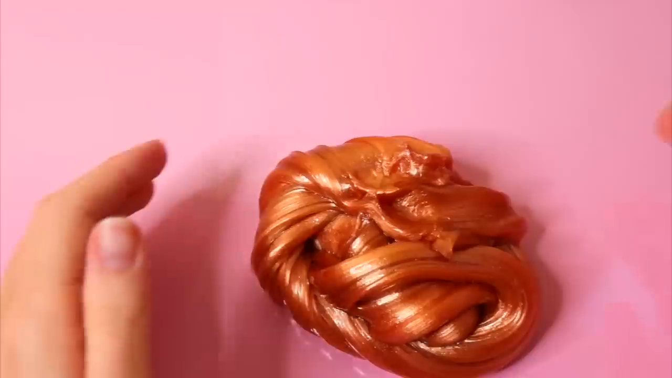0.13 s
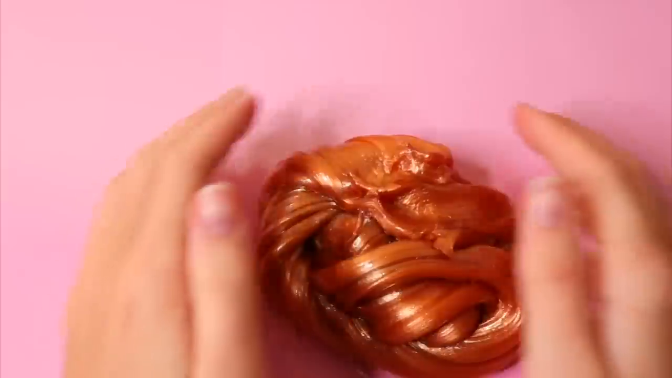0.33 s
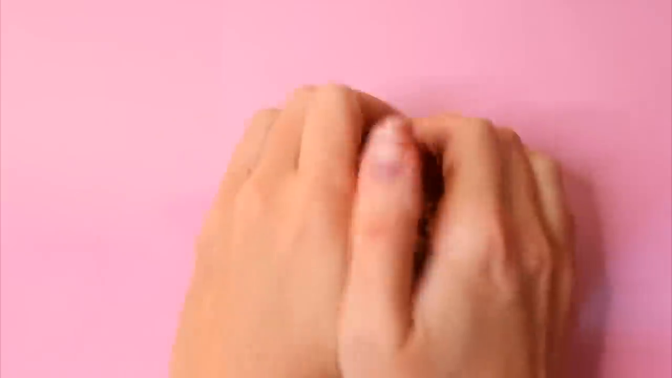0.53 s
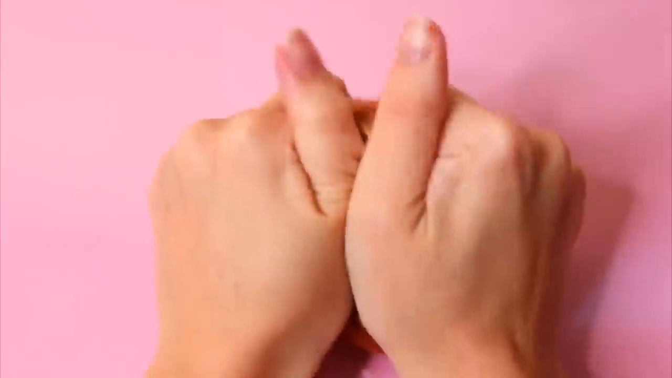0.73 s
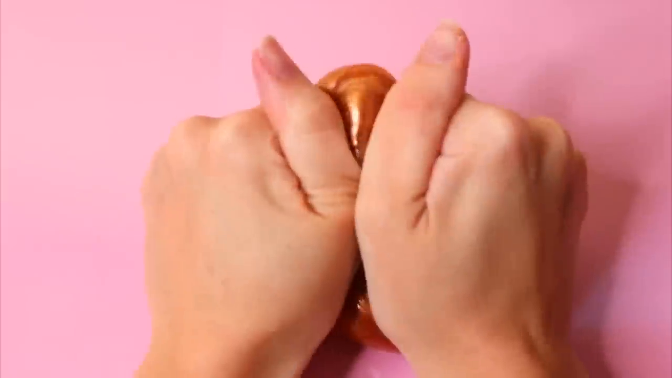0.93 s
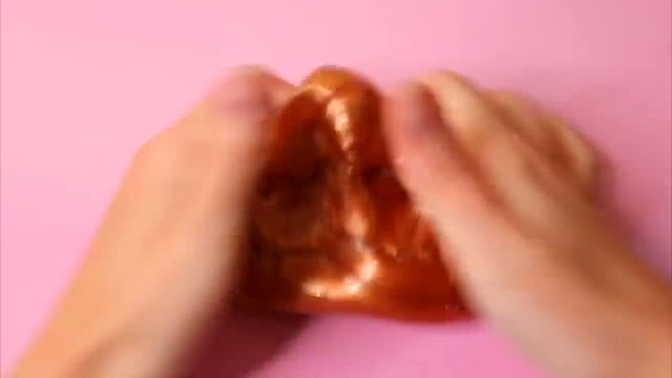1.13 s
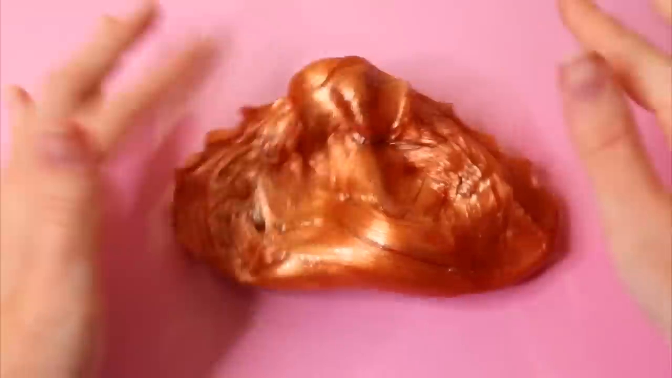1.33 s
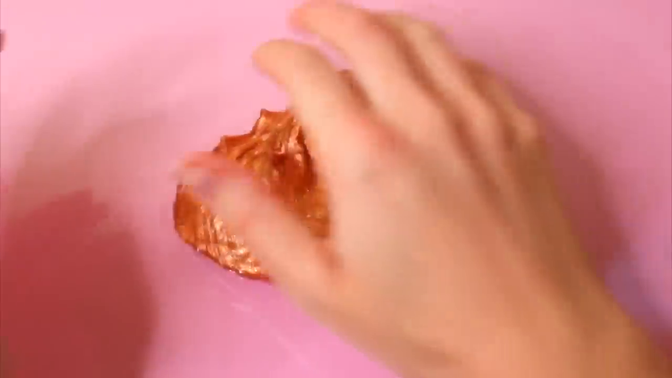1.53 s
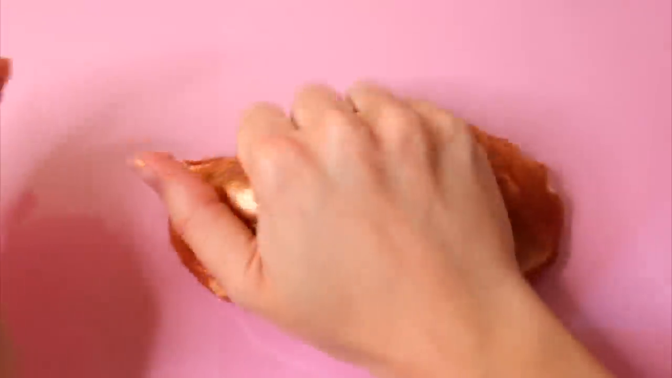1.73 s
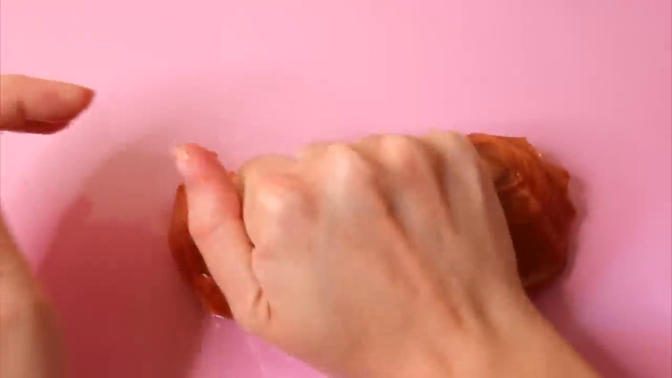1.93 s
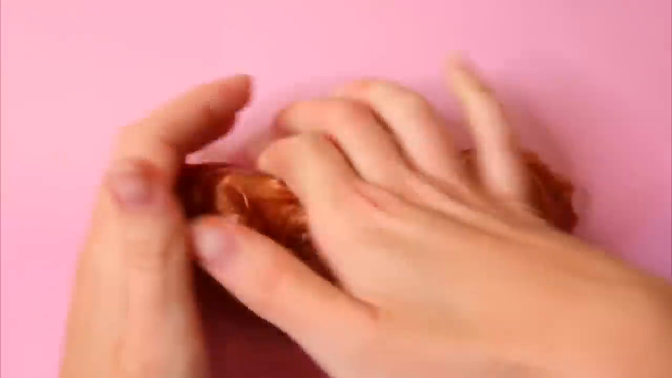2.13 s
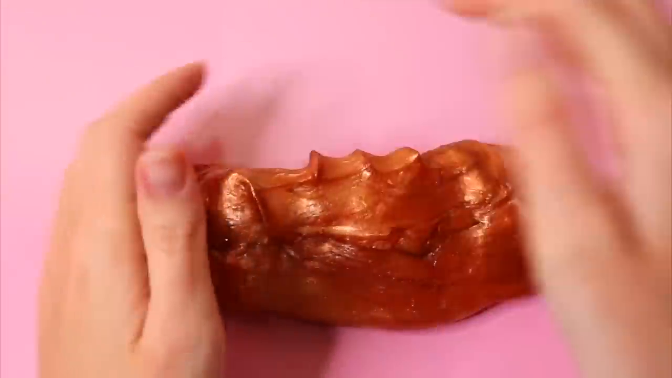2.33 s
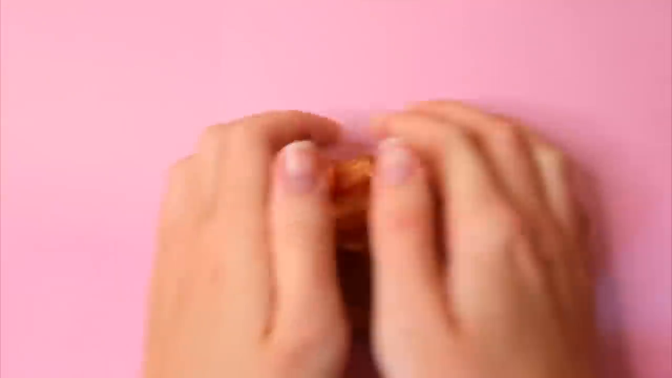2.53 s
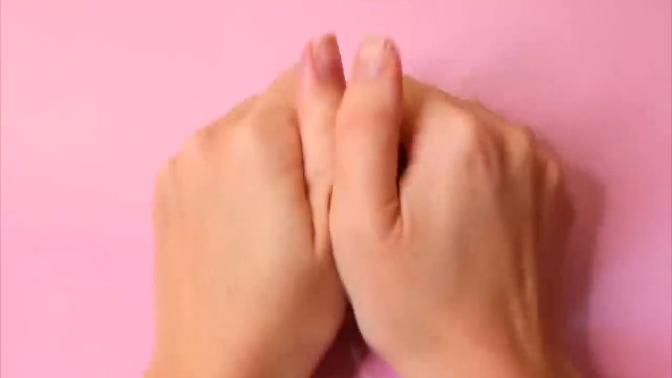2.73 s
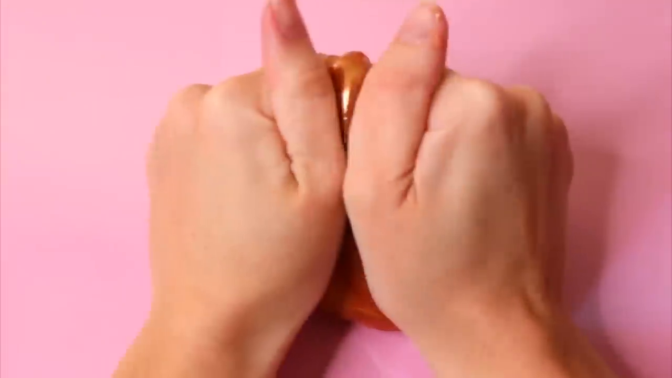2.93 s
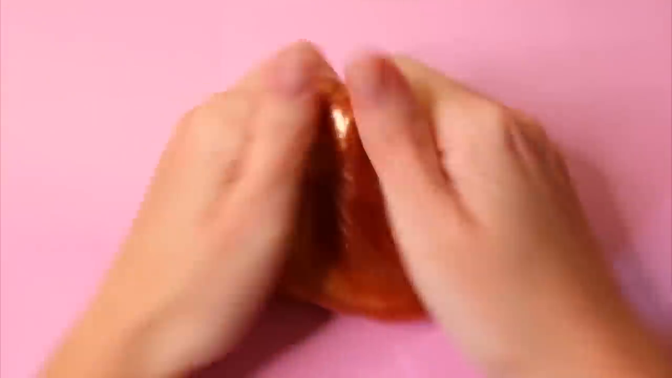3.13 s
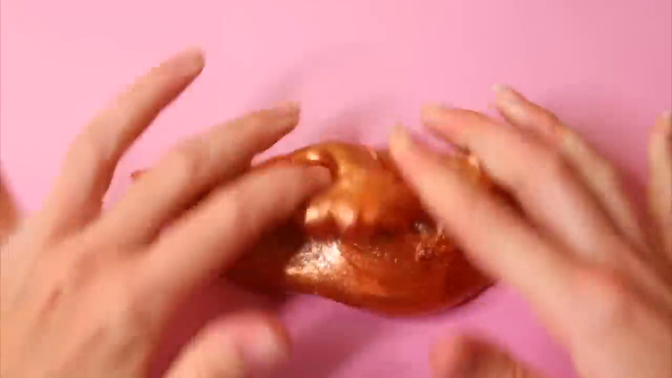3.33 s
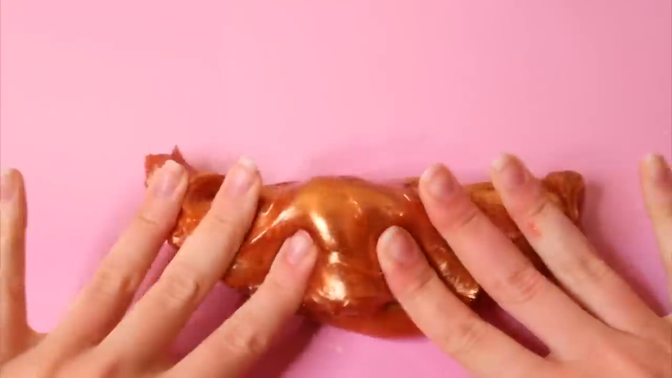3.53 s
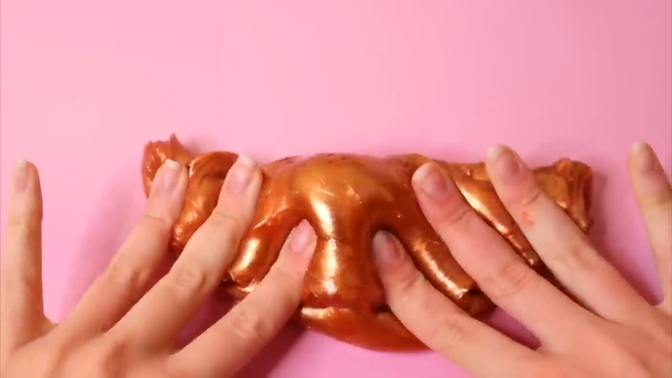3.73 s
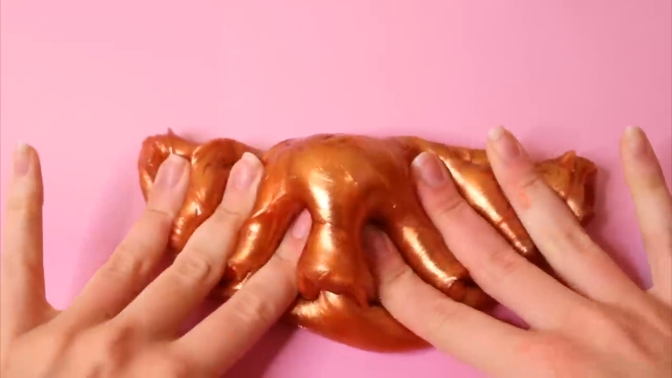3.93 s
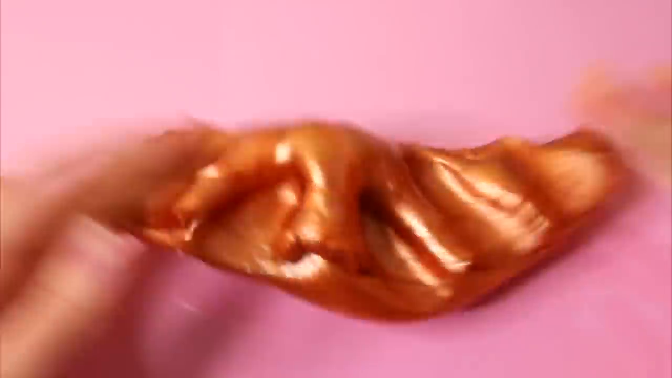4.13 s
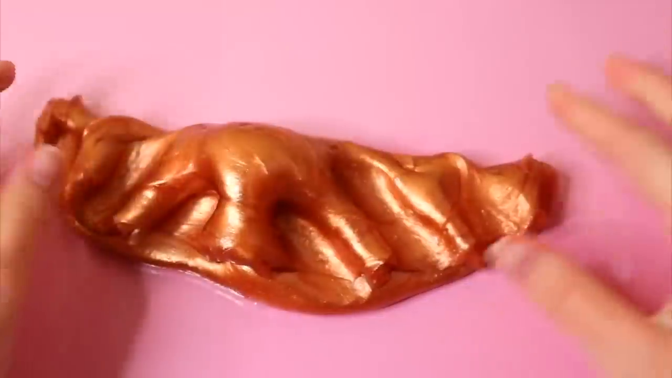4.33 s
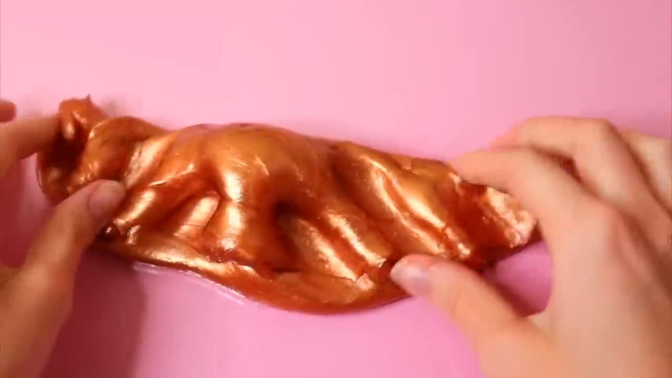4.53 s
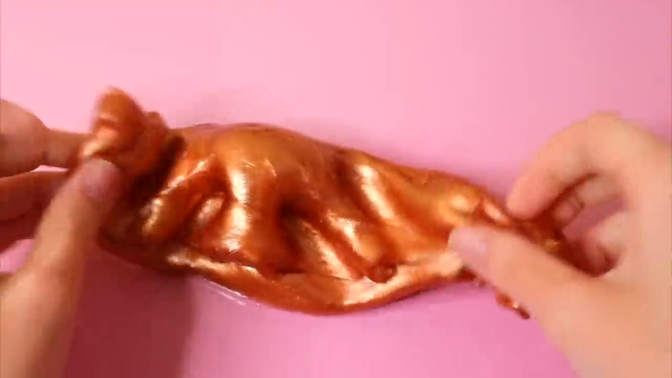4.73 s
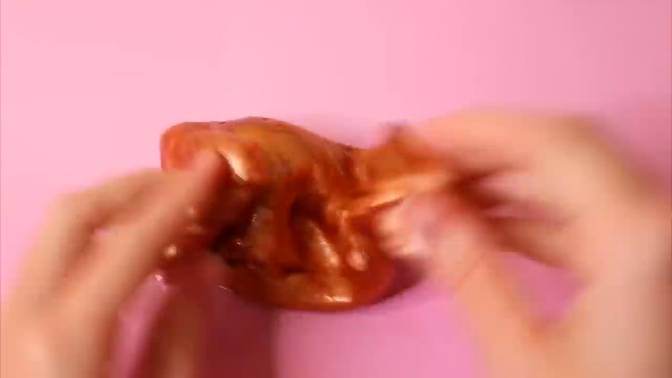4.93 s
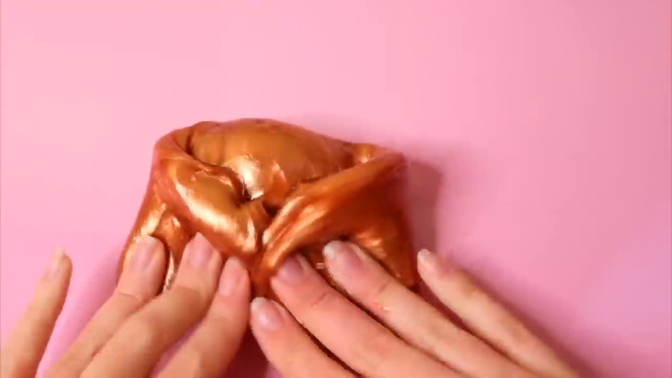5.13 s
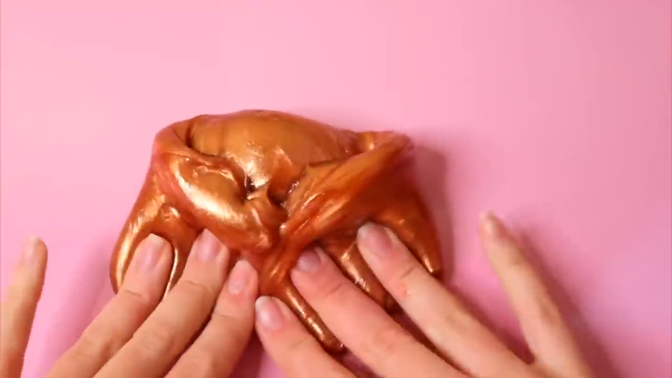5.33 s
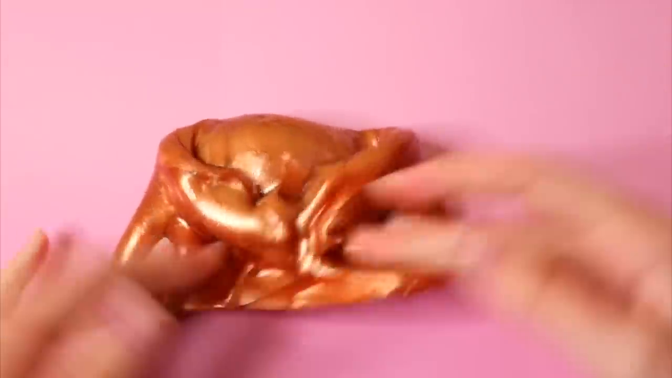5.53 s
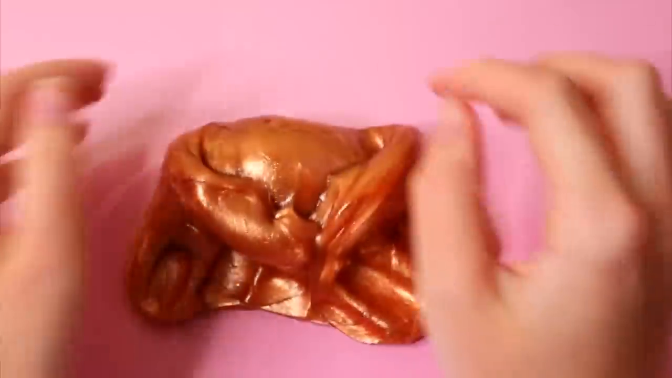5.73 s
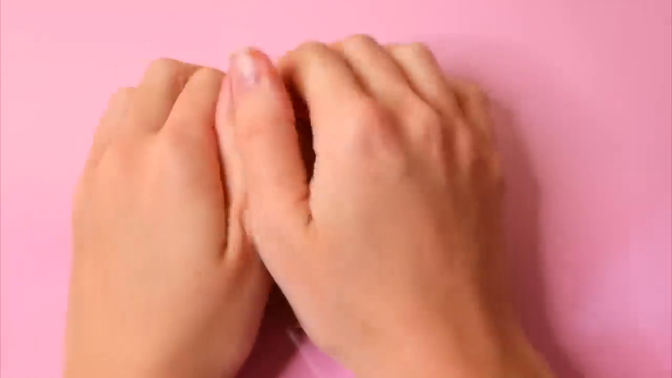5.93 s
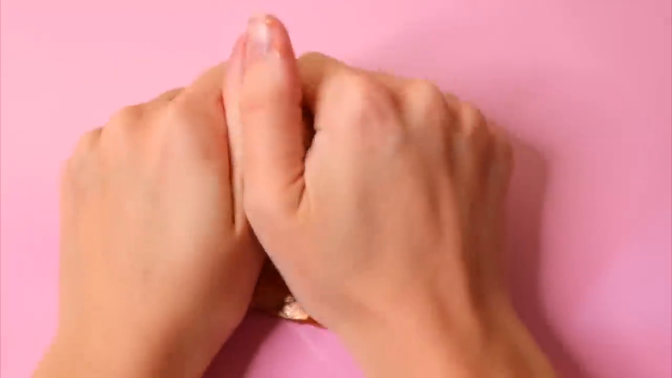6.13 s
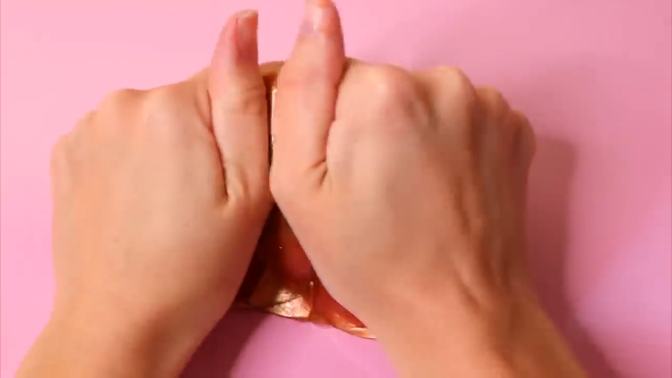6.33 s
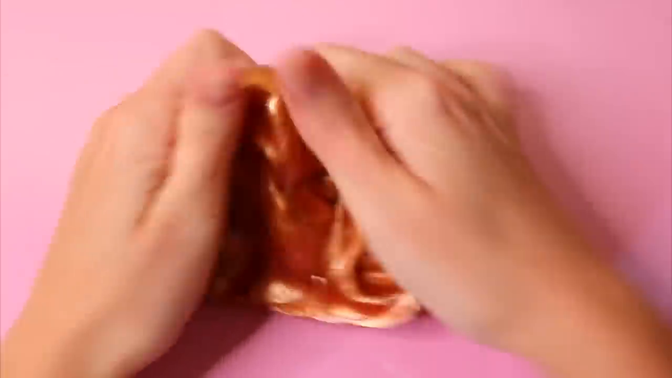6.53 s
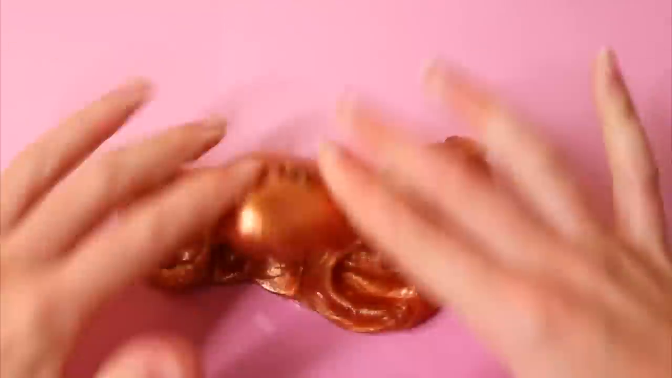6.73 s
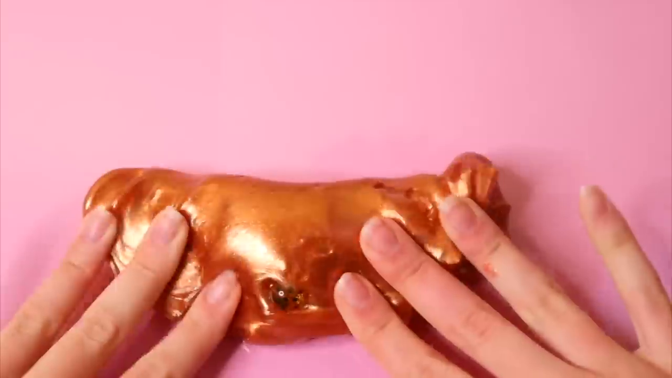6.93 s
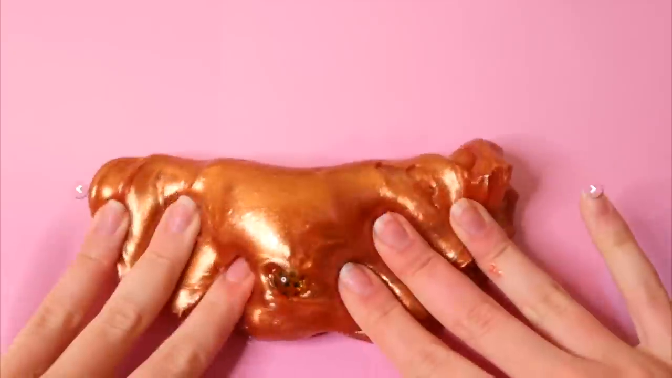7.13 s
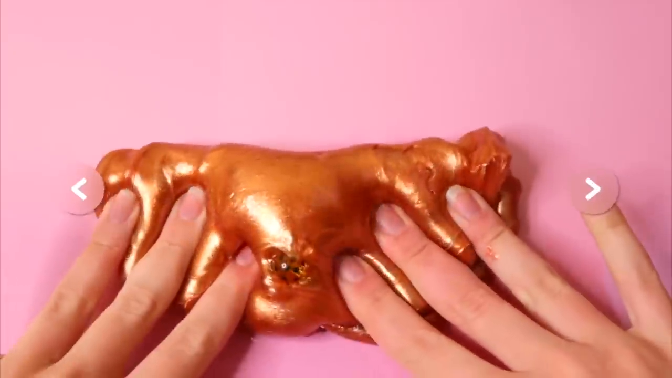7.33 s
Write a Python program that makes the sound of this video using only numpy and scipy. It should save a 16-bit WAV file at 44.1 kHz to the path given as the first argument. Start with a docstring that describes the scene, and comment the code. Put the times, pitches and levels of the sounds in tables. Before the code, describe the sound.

Sticky slime is kneaded on a tabletop in a quiet room, air pockets snapping and popping between peeling crackles and dull bumps.

```python
"""A table top in a quiet room, close to a stereo microphone: hands squeeze, press and peel sticky slime.
Trapped air pockets burst, ringing cavity and film, and each snap reflects off nearby surfaces. Threads
rupture in a fine crackle as skin peels away, and in short rips as a fold tears free. Knuckles and the
lump excite the modes of the hollow table. A short reverberant tail and a soft hiss lie underneath."""
import sys
import numpy as np
from scipy import signal
from scipy.fft import rfft, irfft
from scipy.io import wavfile
from scipy.ndimage import uniform_filter1d

SR = 44100
rng = np.random.default_rng(int(sys.argv[2]) if len(sys.argv) > 2 else 0)


def wav_out(sig):
    """Save sig, one row per channel (or a flat mono array), as 16-bit PCM at SR to the path in sys.argv[1]."""
    wavfile.write(sys.argv[1], SR, np.round(np.clip(np.atleast_2d(sig).T, -1, 1) * 32767).astype(np.int16))


N = 325809
SLIME_PAN_DB = -3.5  # left minus right


def undb(db):
    """Amplitude ratio of a level in decibels."""
    return 10 ** (np.asarray(db) / 20)


def unit(x):
    """Normalisation to an RMS of one."""
    return x / np.sqrt(np.mean(x ** 2))


def curves(table):
    """Linear interpolation of each column over the times in the first."""
    s, *columns = np.transpose(table)
    return [np.interp(np.arange(N) / SR, s, c) for c in columns]


def band(x, hz, width):
    """A second-order resonance with unit gain at its centre and a bandwidth in Hz."""
    return signal.lfilter(*signal.iirpeak(min(hz, .45 * SR), hz / width, SR), x)


def cut(x, hz, kind):
    """A third-order low-pass or high-pass filter."""
    return signal.sosfilt(signal.butter(3, hz, kind, fs=SR, output="sos"), x)


def add(out, at_s, sound):
    """Superposition of a short sound at a given time."""
    i = int(at_s * SR)
    n = min(sound.shape[-1], N - i)
    out[..., i:i + n] += sound[..., :n]


def sides(pan_db):
    """Left and right gains: a level difference gives the direction."""
    return undb(np.array([pan_db, -pan_db]) / 2)[:, None]


def room_noise():
    """Ambient noise: long waves are coherent at the two capsules, short waves are not."""
    # noise spectrum: f/Hz, relative density level/dB
    spectrum = [(15, -36), (25, -5.5), (70, -1), (180, -9), (256, -3), (317, -5.5), (1370, -13.5),
                (1520, -15), (2760, -18.5), (4740, -26), (9840, -20.5), (13600, -29), (16000, -35)]
    # course of the noise: t/s, level/dB, midrange gain/dB
    course = [(0, -67.5, -0.5), (.144, -60.5, -8.5), (.149, -52, -4), (2, -52.5, -2.5), (4.5, -52.5, -2),
              (6.7, -49.5, -1.5), (6.95, -53.5, 1), (7.39, -53.5, 2.5)]
    level_db, middle_db = curves(course)
    knot_hz, knot_db = np.transpose(spectrum)
    hz = np.maximum(np.fft.rfftfreq(N, 1 / SR), 1)
    colour = undb(np.interp(np.log(hz), np.log(knot_hz), knot_db))
    coherence = .95 / (1 + (hz / 250) ** 1.3)
    mid, side = rfft(rng.standard_normal((2, N))) * colour * np.sqrt([1 + coherence, 1 - coherence])
    noise = unit(irfft(np.array([mid + side, mid - side]), N))
    return undb(level_db) * (noise + (undb(middle_db) - 1) * band(noise, 660, 2100))


def reverberation(x):
    """A diffuse field decays exponentially; its bass is much alike at both sides, its treble is not."""
    t = np.arange(SR // 2) / SR
    noise = rng.standard_normal((3, len(t)))
    bass = cut(noise, 498, "low")
    diffuse = noise[1:] - bass[1:] + 1.607 * bass[0] + 0.263 * bass[1:]
    dull = cut(diffuse, 2620, "low")
    bright = cut(diffuse - dull, 14000, "low")
    onset = np.clip(t / 0.001033 - 1, 0, 1)
    tail = 0
    for part, t60, db in ((dull, 0.2535, -6), (bright, 0.273, -9)):
        decay = np.exp(-np.log(1000) * t / t60) * onset
        tail = tail + undb(db) * part * decay / np.linalg.norm(decay)
    return signal.fftconvolve(x.mean(0)[None], tail, axes=1)[:, :N]


def hiss(course, hz, width):
    """Narrow-band noise, amplitude-modulated by a level curve."""
    noise = rng.standard_normal((2, N))
    return undb(curves(course)[0]) * unit(band(band(noise, hz, width), hz, width))


def faint_hiss():
    """A high band of noise swells and fades near the end."""
    # course of the hiss: t/s, level/dB
    course = [(6.82, -90), (6.86, -56), (6.95, -58.5), (7.01, -75.5)]
    return hiss(course, 5670, 1166)


def air_fizz():
    """Turbulence: air escapes through a narrow slit after the biggest pop."""
    # course of the escaping air: t/s, level of the upper band/dB
    course = [(.905, -88), (.912, -31.5), (.95, -34), (1.07, -44), (1.2, -88)]
    return hiss(course, 6990, 900) + undb(-4) * hiss(course, 4900, 1500)


def low_thump(at_s=0.909, peak_db=-28, length_ms=2.1):
    """A brief low thump sounds together with the biggest pop."""
    out = np.zeros(N)
    add(out, at_s, undb(peak_db) * np.hanning(int(length_ms * SR / 1000) + 2))
    return out


def table_knocks(slime_pull, contact_ms=1.462, settle_ms=13):
    """Knocks and the slime's pull drive the same damped modes; a small top radiates no deep bass."""
    # impacts of knuckles and lump: t/s, drive level/dB
    knocks = [(0.523, -37.5), (0.545, -33), (0.628, -32), (0.686, -32.5), (0.715, -31.5), (0.795, -24.5),
              (1.082, -36), (1.185, -27), (1.28, -33.5), (1.667, -11.5), (1.72, -25), (1.785, -11),
              (1.803, -15.5), (1.885, -30), (2.102, -29), (2.51, -32), (2.56, -36), (2.765, -34.5),
              (2.82, -35.5), (2.931, -38.5), (3.038, -33.5), (3.875, -34), (6.42, -26), (4.077, -31),
              (4.151, -28), (4.258, -9), (4.275, -25), (4.312, -25), (4.524, -25.5), (4.62, -36),
              (4.665, -33.5), (4.699, -29.5), (4.804, -35.5), (5.51, -37), (5.561, -32.5), (5.697, -21.5),
              (5.907, -30.5), (5.9565, -24), (5.9635, -18), (6.015, -29), (6.045, -32), (6.662, -20.5)]
    # modes of the hollow table: f/Hz, level/dB, T60/s
    modes = [(195.5, -24.5, 0.084), (276, -3.5, 0.084), (355, -9, 0.0359), (476, -8, 0.032),
             (602.1, -15.5, 0.0315), (752, -16, 0.0277), (1088.3, -27, 0.0466)]
    t = np.arange(SR // 3) / SR
    response = sum(undb(db) * np.sin(2 * np.pi * hz * t) * np.exp(-np.log(1000) * t / t60)
                   for hz, db, t60 in modes)
    force = undb(-20) * slime_pull
    contact = np.hanning(int(contact_ms * SR / 1000) + 2)
    for (s, db), noise in zip(knocks, rng.standard_normal((len(knocks), 2048))):
        # after the first contact the soft mass keeps landing in small bumps
        bumps = 0.0354 * noise * np.exp(-t[:2048] * 1000 / settle_ms)
        bumps[0] = 1
        bumps /= np.sqrt(np.mean(abs(rfft(bumps)[8:20]) ** 2))  # equal strength near the low modes
        add(force, s, undb(db) * np.convolve(bumps, contact) / contact.sum())
    return cut(signal.fftconvolve(force, response)[:N], 253, "high")


def ruptures(per_s, spread_db):
    """A Poisson process: tiny impulses of random sign, some larger than the rest."""
    timing, strength, polarity = rng.random((3, N))
    size = undb(np.minimum(-spread_db * np.log(1 - strength), 14))
    return (timing < per_s / SR) * size * np.sign(polarity - .5)


def uneven_release(per_s, spread_db):
    """Random amplitude modulation: the skin lets go in fits."""
    step = int(SR / per_s)
    steps = np.repeat(rng.standard_normal(N // step + 1), step)
    return undb(spread_db * uniform_filter1d(steps, step // 2)[:N])


def pull_power(s, swell_s, hold_s, fade_s):
    """Power envelope of one pull at every millisecond: exponential growth, hold, exponential decay."""
    t = np.arange(N * 1000 // SR + 1) / 1000 - s
    outside_hold = np.maximum(-t / swell_s, (t - hold_s) / fade_s)
    return 10 ** (-2 * np.maximum(outside_hold, 0))


def peeling_skin():
    """Adhesive failure: threads snap off the skin, ringing wet cavities beneath a bare treble crackle."""
    # pulls: t/s at full strength, squelch level/dB, crackle level/dB, 20 dB swell/s, hold/s, 20 dB fade/s
    pulls = [(0.425, -61, -50.5, 0.25, 0.044, 0.67), (0.683, -48.5, -52, 0.3449, 0.051, 0.13),
             (0.787, -36, -28.5, 0.0589, 0.0053, 0.0743), (0.887, -48.5, -32.5, 0.1243, .005, 0.0634),
             (0.951, -50, -45.5, 0.0532, 0.054, 0.2043), (1.162, -33.5, -31.5, 0.0843, 0.0056, 0.1533),
             (1.722, -51.5, -59.5, 0.0857, .02, 0.18), (1.798, -38.5, -44, 0.12, .002, 0.0573),
             (1.947, -48, -34.5, 0.0879, 0.00194, 0.0216), (2.116, -33, -38, 0.0861, 0.0058, 0.1),
             (2.185, -48, -43, 0.0123, 0.0055, 0.1153), (2.581, -52, -46, 0.01, 0.0049, 0.33),
             (2.748, -52, -50.5, 0.36, 0.047, 0.12), (2.861, -43.5, -45, 0.0754, 0.0176, 0.0755),
             (2.95, -32, -39, 0.0381, .002, 0.052), (3.002, -57, -38, 0.0241, .005, 0.11),
             (3.186, -36, -36, 0.0876, 0.0276, 0.1668), (4.073, -37.5, -40.5, 0.009, 0.0177, 0.2759),
             (4.528, -48.5, -56, 0.01, 0.0044, 0.0529), (4.644, -49, -53.5, 0.0275, 0.054, 0.1868),
             (4.763, -46.5, -46, 0.06, 0.0095, 0.21), (5.592, -43, -43, 0.0867, 0.0346, 0.0634),
             (5.707, -59, -51, 0.03, .005, 0.1), (5.803, -68, -51, 0.0635, 0.0097, 0.07),
             (5.969, -44, -56, 0.0364, .005, 0.1942), (6.105, -47.5, -53.5, 0.0941, 0.0049, 0.2145),
             (6.257, -47.5, -49, 0.1065, 0.0194, 0.4476), (6.431, -39, -42, 0.0576, 0.00205, 0.1324),
             (6.575, -37.5, -37, 0.0981, .01, 0.1571), (6.714, -63, -51.5, 0.4, 0.045, 0.1)]
    # resonances of the wet cavities: f/Hz, bandwidth/Hz, relative level/dB
    cavities = [(756.7, 486, -2.5), (1165, 367, 3.5), (1698, 600, -2.5), (2321, 663, -1), (3360, 1340, -1)]
    # spectrum of the crackle: f/Hz, bandwidth/Hz, relative level/dB
    crackle_bands = [(5300, 1800, -7), (7655, 3110, 1.5), (9740, 5140, -3.5), (14000, 11000, -13)]
    power = sum(undb([[squelch_db], [crackle_db]]) ** 2 * pull_power(s, *times_s)
                for s, squelch_db, crackle_db, *times_s in pulls)
    t_ms = np.arange(N) * 1000 / SR
    squelch_gain, crackle_gain = (np.interp(t_ms, np.arange(len(v)), v) for v in np.sqrt(power))
    fits = uneven_release(per_s=120, spread_db=2.3)
    squelch = sum(undb(db) * unit(band(band(ruptures(.5 * hz, 3.6), hz, width), hz, 2 * width))
                  for hz, width, db in cavities)
    # some ruptures reach both capsules, others only one
    ticks = ruptures(4400, 3.22) + 1.345 * np.array([ruptures(3400, 3.33), ruptures(3700, 3.85)])
    crackle = cut(sum(undb(db) * band(ticks, hz, width) for hz, width, db in crackle_bands), 3200, "high")
    peel = squelch_gain * unit(fits * squelch) + crackle_gain * unit(fits * crackle)
    return peel * sides(SLIME_PAN_DB)


def burst(tear, length_ms, pocket_db, snap_db, pocket_hz, snap_hz, pan_db, pocket_q, stereo_spread):
    """Resonance: a tear (rows: shared, left, right) rings the opened air pocket and the thin film."""
    shared = tear[0]
    film = shared + stereo_spread * tear[1:]
    snap = band(film, snap_hz, 0.33 * snap_hz) + .12 * cut(film, 12000, "low")
    snap = cut(snap, 2600, "high")
    pocket = band(shared, pocket_hz, pocket_hz / pocket_q) + 0.06 * cut(shared, 693, "high")
    pocket = cut(pocket, max(3500, 1.348 * pocket_hz), "low")
    pop = undb(snap_db) * snap / np.linalg.norm(snap[0])
    pop += undb(pocket_db) * pocket / np.linalg.norm(pocket)
    return np.sqrt(length_ms * SR / 1000) * pop * sides(pan_db)  # energy grows with the length


def ripping_folds():
    """Cascading rupture: a palm or fold tears free in an uneven run of snaps that swells and dies away."""
    # rips: t/s, pocket level/dB, snap level/dB, pocket f/Hz, snap f/Hz, length/ms
    rips = [(0.793, -25, -25.5, 2200, 4200, 6.2), (0.85, -26, -24, 842, 6790, 4.33),
            (0.893, -40.5, -22, 2830, 10770, 8.45), (0.9095, -29.5, -17, 4480, 7000, 3.5),
            (1.159, -35, -32.5, 1307, 7300, 15.5), (1.173, -37, -31, 1130, 6440, 17),
            (1.793, -29, -33.5, 2400, 4220, 12.16), (2.078, -50, -56.5, 1360, 8300, 15.4),
            (2.103, -23.5, -24.5, 1054, 8800, 16.8), (2.122, -27.5, -24, 2400, 7400, 9.6),
            (3.012, -54.5, -30.5, 1150, 9000, 8.4), (3.159, -41, -49, 917, 3930, 38),
            (3.19, -34.5, -43, 1280, 8600, 18.2), (3.208, -34, -50, 1226, 7550, 24.9),
            (4.068, -44.5, -43, 1490, 8500, 8.5), (4.086, -41, -43.5, 1456, 6000, 10.4),
            (4.263, -36, -50, 880, 7200, 33.8), (4.348, -44.5, -50.5, 1114, 6640, 12.9),
            (5.56, -50.5, -50.5, 2740, 3870, 49), (5.638, -41.5, -44, 3300, 7000, 7.3),
            (6.5665, -31, -30, 1020, 8000, 5.3), (6.576, -24.5, -29.5, 1088, 2900, 9),
            (6.59, -33.5, -31, 1093, 8500, 10.3), (6.604, -35.5, -43.5, 1157, 3780, 17.3)]
    out, t = np.zeros((2, N)), np.arange(4096) / SR
    for (s, *timbre, length_ms), noise in zip(rips, rng.standard_normal((len(rips), 4, 4096))):
        progress = t * 1000 / length_ms
        envelope = progress ** 0.205 * np.exp(-progress ** 3)
        grain = np.exp(.6 * noise[3])
        tear = noise[:3] * grain * envelope
        add(out, s, burst(tear, length_ms, *timbre, SLIME_PAN_DB, pocket_q=2.79, stereo_spread=0.87))
    return out


def bursting_pockets(length_ms=4, cupped_db=-8, delay_scatter=0.02):
    """Impulsive excitation as a film gives way; returns the pops with and without early reflections."""
    # air pockets: t/s, pocket level/dB, snap level/dB, pocket f/Hz, snap f/Hz, left minus right/dB
    pockets = [(0.6251, -34, -34.5, 3390, 3970, -4.5), (0.6993, -40, -39, 1840, 6520.0, -2),
               (0.723, -36.5, -33.5, 1840, 6870.0, 0.5), (0.7491, -32.5, -24.5, 2290.0, 3950.0, -1),
               (0.7617, -22.5, -17, 2290, 9860, -5.5), (0.7808, -33, -14, 1390, 6500, 4),
               (0.7903, -24.5, -19, 1050, 6580, -1), (0.8385, -31, -24, 4300, 9000, -9),
               (0.8461, -27, -22.5, 774, 10110.0, 4), (0.8774, -36.5, -17.5, 970, 13470.0, -6),
               (0.8915, -28.5, -15, 3430.0, 10270, -0.5), (0.887, -37.5, -28.5, 3000, 11000, -1.5),
               (0.909, -11, -10, 4510, 6920, 3.5), (1.0012, -42, -25, 2300, 8270, -5.5),
               (1.038, -61, -33.5, 1910.0, 7260.0, -3), (1.0763, -60.5, -36, 2240.0, 9950, 7),
               (1.156, -30, -20, 1270, 6770, -1.5), (1.1707, -28, -18.5, 2920, 7330, 3),
               (1.36, -46.5, -52, 1304, 4000, -3), (1.668, -35.5, -43.5, 1245, 3870.0, -7),
               (1.7398, -44.5, -35, 1340.0, 11960, -4), (1.8627, -40.5, -32, 2360, 8480, -3.5),
               (1.8828, -55.5, -32.5, 2250.0, 14560.0, 1), (1.897, -61, -37, 2270.0, 13630.0, -6),
               (1.912, -25, -19, 2200, 7020, -1.5), (1.9431, -35, -19, 2260, 9670, -6.5),
               (2.095, -35, -42, 2230, 3690, -5.5), (2.574, -37.5, -23.5, 2810, 12350, -1.5),
               (2.869, -45, -36.5, 2000, 12500, -2.5), (2.8769, -44.5, -33, 2260.0, 11890.0, -1.5),
               (2.9273, -22.5, -31, 2230, 5400, -3.5), (2.95, -22, -26, 2450, 4040, -11.5),
               (2.9565, -21.5, -42, 1640, 3710.0, -4.5), (2.964, -30, -33, 1190, 7800, 1),
               (2.981, -44, -39, 1100.0, 10490.0, 4), (2.9932, -35, -14.5, 2370, 10500, -2),
               (3.064, -48, -36, 2660.0, 11400, -4.0), (3.8686, -40, -23, 2400, 11800, -5),
               (3.8783, -37, -17, 2400, 12200, -4.5), (4.2579, -16.5, -32, 1750, 7000, -6),
               (4.521, -44.5, -46, 930.0, 9250.0, 0), (5.1057, -57.5, -43, 1120.0, 8550, -9),
               (5.113, -54, -45.5, 2200, 11000, -3.5), (5.479, -59, -48.5, 2000, 13000, -2.5),
               (5.6956, -32, -36, 1750, 3360, -5.5), (5.9635, -42, -47, 1650, 3100, -4),
               (6.2186, -30, -36.5, 2270, 3590, -1), (6.2482, -39, -47, 2200, 7500, -1.5),
               (6.2656, -47.5, -31, 2820.0, 10200, -7.5), (6.271, -36, -40, 1800, 5500, -3),
               (6.3065, -40, -43, 1920, 3760.0, 0.5), (6.329, -42.5, -42.5, 2500, 4500, -2.5),
               (6.3595, -36, -27.5, 1280, 10000, -2.5), (6.386, -37.5, -43, 1230, 9580, -1.5),
               (6.419, -17.5, -11.5, 1500, 7240, -1.5), (6.454, -50, -34, 2500, 13000, -3.5),
               (6.661, -24, -36, 704, 2800, -3.5)]
    # cupped palms shield the pops from nearby surfaces: start t/s, end t/s
    cupped = [(.77, .9), (1.15, 1.2), (2.92, 2.97)]
    # reflections off those surfaces: delay/ms, level/dB, scatter between pops and sides/dB
    echoes = [(1.05, -10, 4), (1.76, -1.5, 2), (2.4, -6, 3.5)]
    reflected, bare, t = np.zeros((2, N)), np.zeros((2, N)), np.arange(512) / SR
    envelope = np.exp(-t / 0.00022) + .13 * np.exp(-t / .003)
    scatters = rng.standard_normal((len(pockets), len(echoes), 3))
    tears = rng.standard_normal((len(pockets), 3, 512))
    for (s, *timbre, pan_db), tear, scatter in zip(pockets, tears, scatters):
        tear[0, 0] = 3.3  # a sharp edge leads the ragged tear
        pop = burst(tear * envelope, length_ms, *timbre, pan_db, pocket_q=3.1, stereo_spread=1.5)
        heard = pop.copy()
        shield_db = cupped_db * any(start < s < end for start, end in cupped)
        for (delay_ms, db, scatter_db), (lateness, *strength) in zip(echoes, scatter):
            lag = int(delay_ms * (1 + delay_scatter * lateness) * SR / 1000)
            gain = undb(db + shield_db + scatter_db * np.array(strength))
            heard[:, lag:] += gain[:, None] * pop[:, :-lag]
        add(reflected, s, heard * np.linalg.norm(pop) / np.linalg.norm(heard))
        add(bare, s, pop)
    return reflected, bare


def scene():
    """Superposition of direct sound, the vibration it drives in the table, reverberation and noise."""
    pops, bare_pops = bursting_pockets()
    rips, peel = ripping_folds(), peeling_skin()
    knocks = table_knocks(peel.mean(0) + undb(-17.5) * rips.mean(0))
    direct = cut(pops + rips + peel, 452.6, "high")
    to_walls = cut(bare_pops + rips + peel, 300, "high") + undb(-5.5) * knocks
    slime = direct + reverberation(to_walls)
    slime -= .3 * band(slime, hz=4800, width=800)  # a shallow dip in the treble
    return slime + knocks + room_noise() + air_fizz() + faint_hiss() + low_thump()


def record(dry):
    """Clipping at full scale, then band limiting by a steep low-pass at 16 kHz."""
    return signal.sosfilt(signal.ellip(12, .3, 100, 16000, fs=SR, output="sos"), np.clip(dry, -1, 1))


dry = scene()
out = record(dry)
wav_out(out)
```